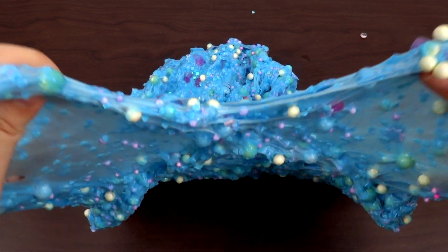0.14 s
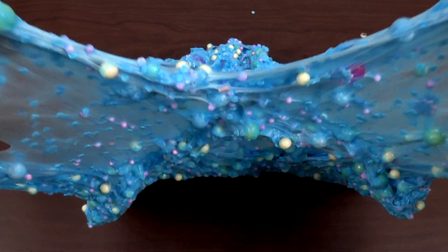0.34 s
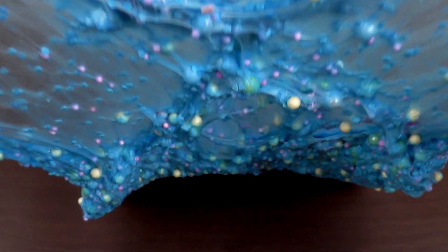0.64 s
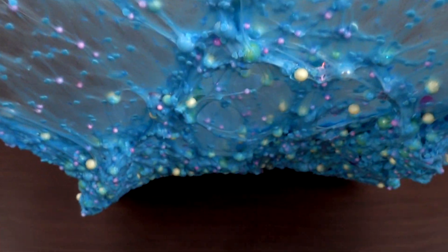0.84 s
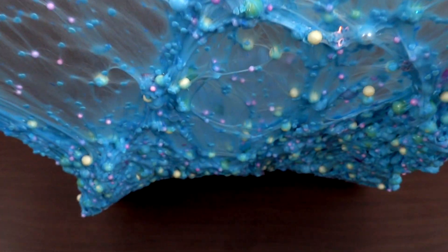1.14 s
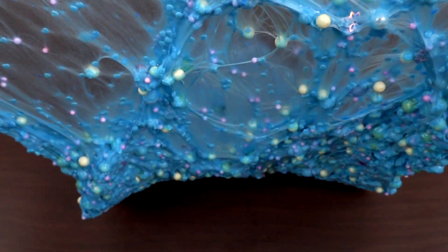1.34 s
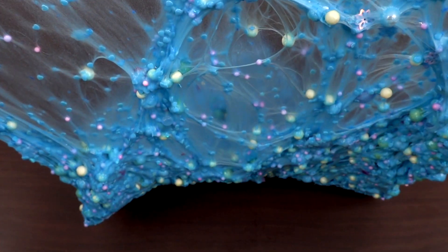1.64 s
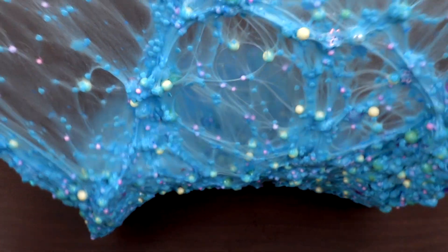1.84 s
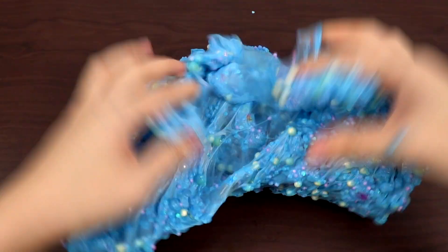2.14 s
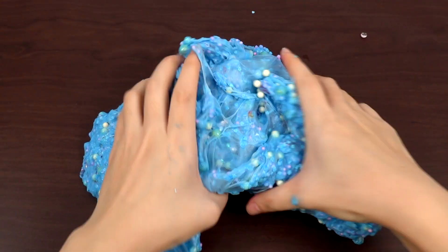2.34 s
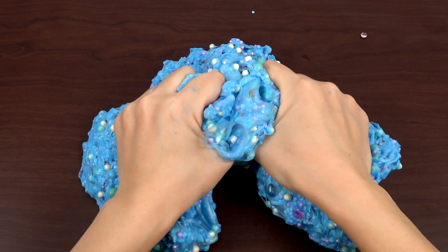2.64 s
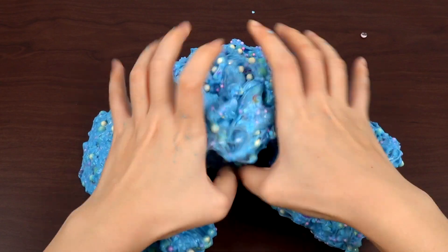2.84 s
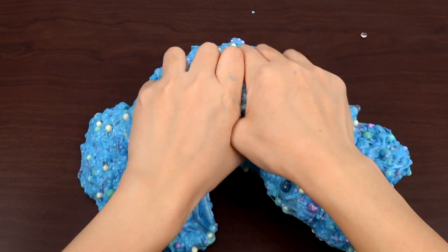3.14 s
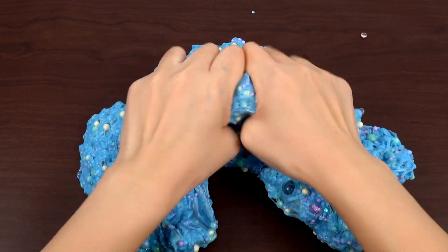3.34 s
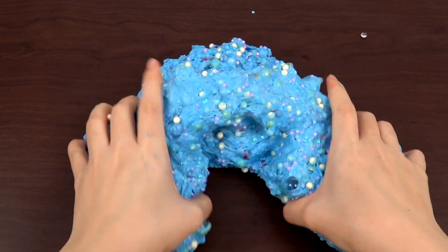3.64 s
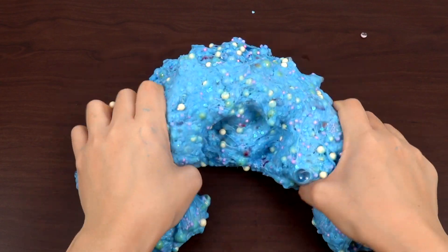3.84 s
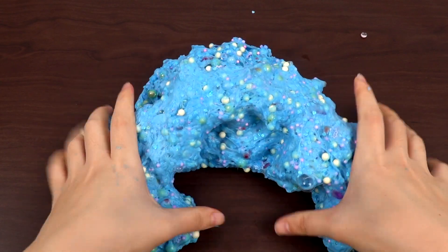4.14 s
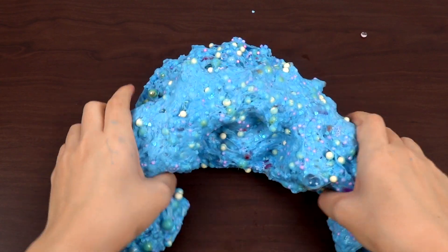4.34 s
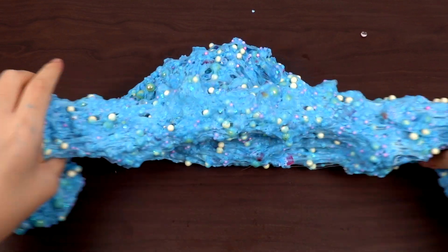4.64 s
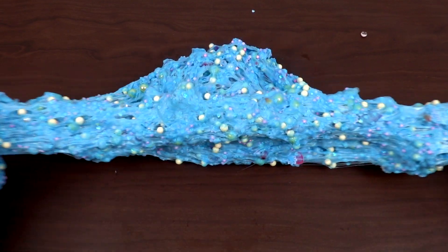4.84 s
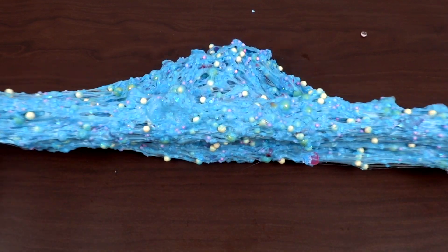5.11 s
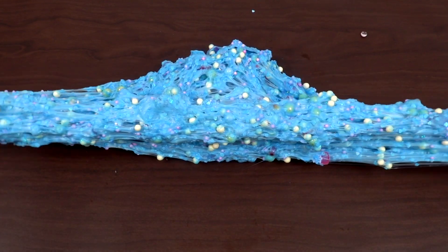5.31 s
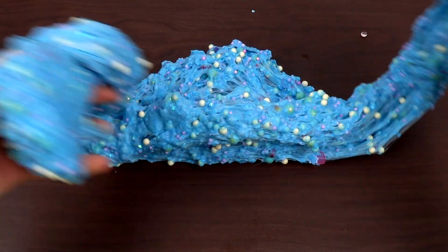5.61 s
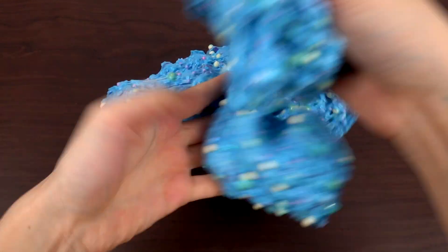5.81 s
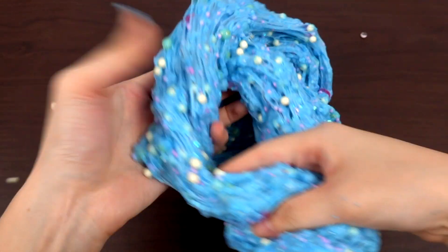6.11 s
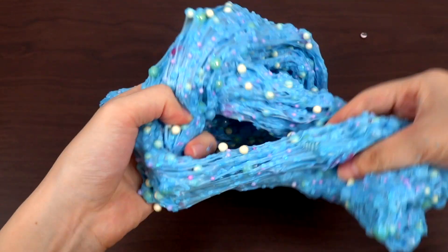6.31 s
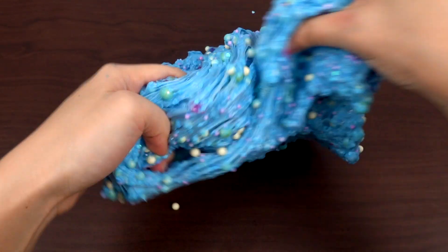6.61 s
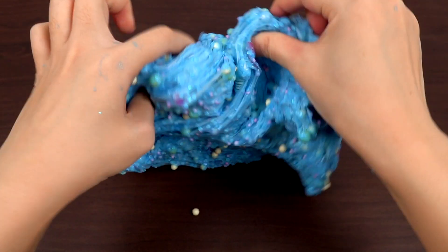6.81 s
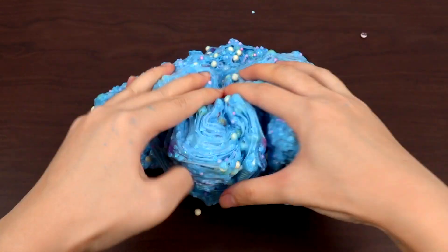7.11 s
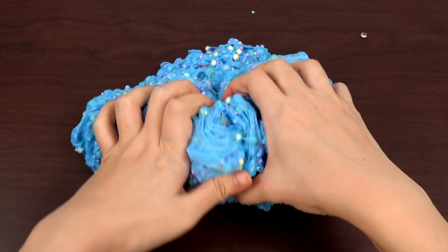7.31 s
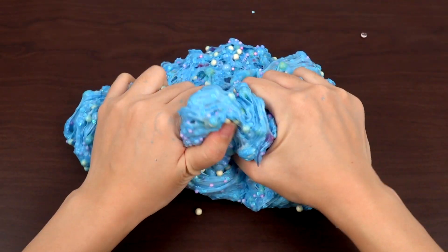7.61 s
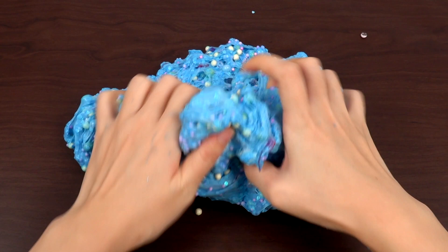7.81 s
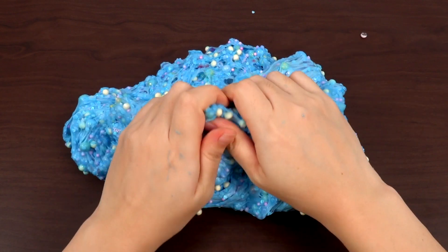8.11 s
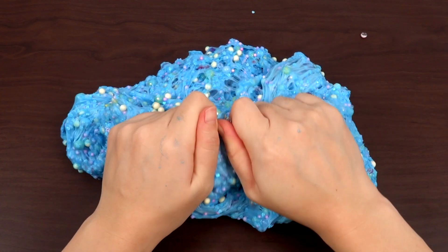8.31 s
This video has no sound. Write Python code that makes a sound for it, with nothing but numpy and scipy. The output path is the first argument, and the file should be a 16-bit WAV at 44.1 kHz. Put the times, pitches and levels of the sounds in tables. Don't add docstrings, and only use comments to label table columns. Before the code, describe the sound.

Crunchy foam-bead slime fizzes softly, then bursts into dense squelchy popping as hands squeeze, fold and squeeze it again in a quiet room.

```python
import sys
import numpy as np
from scipy import signal
from scipy.fft import rfft, irfft
from scipy.io import wavfile
from scipy.ndimage import uniform_filter1d

SR = 44100
rng = np.random.default_rng(int(sys.argv[2]) if len(sys.argv) > 2 else 0)


def wav_out(sig):
    wavfile.write(sys.argv[1], SR, np.round(np.clip(np.atleast_2d(sig).T, -1, 1) * 32767).astype(np.int16))


def voltage_ratio(level):
    return 10 ** (np.asarray(level, float) / 20)


N = 373086


def rms_one(x):
    return x / np.sqrt(np.mean(x ** 2) + 1e-20)


def at_hz(points, hz):
    table_hz, values = np.transpose(points)
    return np.interp(np.log(hz), np.log(table_hz), values)


def in_time(rows):
    start_s, *columns = np.transpose(rows)
    return [np.interp(np.arange(N) / SR, start_s, column) for column in columns]


def bandpass(x, order, low_hz, high_hz):
    return signal.sosfilt(signal.butter(order, [low_hz, high_hz], "band", fs=SR, output="sos"), x)


def drift(rate_hz):
    r = np.exp(-40 * np.pi * rate_hz / SR)
    noise = rng.standard_normal(N // 20 + 4002)
    slow = signal.lfilter([1], [1, -2 * r, r * r], noise)[4000:]
    return np.interp(np.arange(N) / 20, np.arange(len(slow)), rms_one(slow))


# start_s [s], peak_db [dB], pitch_hz [Hz], ring_cycles [cycles]
RINGING = [(0.0339, -21, 3260, 2.4), (.1912, -33.5, 2390, 2.8), (0.1986, -30.5, 2490, 2.8),
           (0.771, -32.5, 4840, 7), (2.4289, -3, 6300, 3), (2.6181, -3.5, 4050, 3.6),
           (2.6872, 1.5, 2670, 1.8), (2.7054, -10.5, 4740, 11), (3.026, -11.5, 4980, 15),
           (3.0344, -3, 2630, 3.9), (3.0851, -7, 1780, 3.7), (3.119, -10, 1750, 3.2),
           (3.1687, 0.5, 3300, 7.2), (3.2131, -19, 4690, 4.8), (3.2225, -10.5, 5000, 4.1),
           (3.2361, -4, 4040, 4.9), (3.2398, -18, 3360, 4.2), (3.323, -13, 2270, 3.1),
           (4.394, -17.5, 6500, 2.8), (4.5962, -15.5, 5450, 3.7), (4.8928, -9, 9300, 5.3),
           (4.8925, -5.5, 5120, 11), (4.9993, -21.5, 5700, 3.8), (5.4478, -30.5, 3600, 4),
           (5.6418, -29.5, 2720, 3.1), (6.675, -9.5, 3280, 4.9), (6.9275, -23.5, 2830, 5.2),
           (7.5928, 3.5, 9580, 9.5), (7.6636, -15, 5960, 4.1), (8.1447, -2.5, 4930, 4.6)]
# start_s [s], peak_db [dB], pitch_hz [Hz]
KNOCKS = [
    (2.6879, -16, 380),
    (2.6188, -11, 1350),
    (3.327, -28.5, 540),
    (4.066, -28.5, 1100),
    (3.9, -17, 645),
    (4.8938, -28, 940),
    (4.9337, -40, 770),
    (5.3072, -28, 1380),
    (5.94, -38, 920),
    (7.3, -22.5, 1360),
]
# start_s [s], peak_db [dB], pitch_hz [Hz]
SPLITTING = [(.0047, -31.5, 7000), (.405, -29.5, 2780), (1.345, -43, 7150), (1.727, -29.5, 4470),
             (2.2115, -25.5, 9500), (2.2541, -25.5, 4800), (2.4617, -12, 8850), (2.6456, -5.5, 5030),
             (2.7255, -10.5, 5250), (3.0191, -25, 2820), (3.0544, -15, 1740), (3.1149, -13.5, 1700),
             (3.1578, -11, 6150), (3.2078, -20, 9600), (3.271, -13.5, 2650), (3.5996, -25.5, 3000),
             (3.6674, -17.5, 7350), (3.7143, -14.5, 1260), (3.8769, -21, 4550), (3.9115, -16.5, 4840),
             (3.9462, -28, 3870), (4.3521, -20.5, 2460), (4.5238, -24.5, 2750), (4.6903, -18.5, 4330),
             (4.7583, -22, 3100), (4.9345, -22.5, 7860), (5.2337, -42, 4690), (5.2641, -24.5, 2600),
             (5.2749, -28, 4950), (5.3072, -21.5, 4280),
             (5.7086, -36.5, 2900), (5.9083, -29, 6140), (6.0001, -34, 3150), (6.1708, -28, 2020),
           (6.2317, -20.5, 4430), (6.3774, -25.5, 2570), (6.419, -31.5, 10330), (6.55, -43, 5030),
           (6.647, -21, 6860), (6.747, -16.5, 4940), (6.97, -18, 10000), (7.092, -21, 4240),
           (7.1609, -21, 5040), (7.1833, -21, 2180), (7.2235, -17, 4120), (7.3209, -20, 5330),
           (7.3649, -18, 4900), (7.4262, -18.5, 3230), (7.5374, -24.5, 5680), (7.6004, -9, 5900),
           (7.6798, -8, 11100), (7.727, -30, 5510), (7.7594, -33, 5360), (7.806, -27, 3570),
           (8.1327, -18, 4160), (8.161, -8.5, 4470), (8.3608, -16.5, 3450), (8.3784, -14.5, 5160),
           (8.4036, -15.5, 6540), (8.4429, -16, 3750),
             (.108, -40, 2020), (1.831, -37, 3540), (2.566, -25, 8900), (2.5952, -34, 9500),
              (2.652, -14, 5130), (3.4204, -21, 2760), (3.7453, -14.5, 2400), (3.86, -22, 5330),
              (6.6806, -17.5, 3140), (7.623, -9.5, 12300), (8.0295, -30, 2900), (8.1076, -42, 5100),
              (4.8814, -25, 9000), (8.1447, -11.5, 9500), (3.1696, -9.5, 9600), (0.214, -35.5, 6000),
              (.522, -42, 7000), (.698, -42, 7000), (.7458, -38, 5000), (0.817, -42, 5000),
              (1.038, -41.5, 9470), (1.152, -47, 9500), (1.892, -39, 5000), (7.302, -27.5, 1800),
              (7.524, -25, 3000)]
# start_s [s], peak_db [dB], pitch_hz [Hz]
TEARING = [(.4535, -34.5, 9100), (.8736, -32.5, 5400), (1.0483, -33, 2730), (1.4874, -43, 3100),
           (3.3281, -5, 9400), (3.3526, -20, 9800), (4.222, -27, 9560), (4.6248, -41, 6500),
           (4.8165, -26, 9100), (5.4305, -25.5, 6980), (6.8553, -30.5, 10100), (7.4891, -23, 9900),
           (1.9842, -21, 9000), (4.897, -20.5, 5150), (5.8184, -27.5, 11700), (6.0746, -23, 8600),
           (6.2677, -17.5, 5240), (7.0144, -12.5, 10000), (7.0311, -47, 9350), (7.3315, -19.5, 8700),
           (7.4611, -15, 3380), (8.2365, -27.5, 9140), (8.421, -17, 5210)]


def pops():
    clean_db, soft_db, split_db, tear_db = -22, -40, -8.5, 0.5
    spread_db, lag_s, crack_t60_s = 1.5, .000024, .0018
    length = 600
    rows = [(*row, clean_db) for row in RINGING]
    rows += [(*row, 2.73, soft_db) for row in KNOCKS]
    for table, crack_db in [(SPLITTING, split_db), (TEARING, tear_db)]:
        for start_s, peak_db, pitch_hz in table:
            ring_cycles = 3.77 * (pitch_hz / 4000) ** 0.45
            rows.append((start_s, peak_db, pitch_hz, ring_cycles, crack_db))
    out, t = np.zeros((2, N + 610)), np.arange(length) / SR
    noise = rng.standard_normal((len(rows), length))
    places = noise[:, -1]
    cracks = bandpass(noise, 2, 1000, 10500) * voltage_ratio(-60 * t / crack_t60_s)
    for (start_s, peak_db, pitch_hz, cycles, crack_db), place, crack in zip(rows, places, cracks):
        swell = 1 - np.exp(-t * pitch_hz * 0.71)
        decay = voltage_ratio(-60 * t * pitch_hz / (1.1 * np.clip(cycles, 1, 14)))
        cavity = np.sin(2 * np.pi * pitch_hz * t) * decay * swell
        burst = cavity / np.sqrt(np.sum(cavity ** 2))
        burst = burst + voltage_ratio(crack_db + 2.5) * crack / np.sqrt(np.sum(crack ** 2))
        burst *= -voltage_ratio(peak_db) / np.max(np.abs(burst))
        i = int(start_s * SR) - 2
        late = round(place * lag_s * SR)
        out[0, i:i + length] += burst * voltage_ratio(spread_db * place / 2)
        out[1, i + late:i + late + length] += burst * voltage_ratio(-spread_db * place / 2)
    return out[:, :N]


def spray(bursts):
    level_db, t60_s = -11.5, 0.081
    t = np.arange(int(.12 * SR)) / SR
    droplet_db = 9.0 * rng.standard_normal(len(t)) - 60 * t / t60_s
    trail = rng.standard_normal(len(t)) * voltage_ratio(droplet_db) * (t > .002)
    trail = signal.lfilter([1], [1, -.5], trail)
    trail /= np.sqrt(np.sum(trail ** 2))
    return voltage_ratio(level_db) * signal.oaconvolve(bursts, trail[None], axes=1)[:, :N]


# [dB, deeper and duller]
STROKES = [(0, 0.11, -68, -3, -10.5), (1.92, 0.087, -65.5, 12, -3.5), (2.01, 0.068, -53.5, -10.5, -16),
           (2.15, .32, -54.5, -0.5, 1.5), (2.54, 0.14, -48.5, 12, 2), (2.8, 0.075, -46.5, 2, 2.5),
           (3.01, 0.15, -49.5, 0, 1), (3.2, 0.14, -56, 6.5, -3), (3.41, 0.08, -51, 3, 2.5),
           (3.65, 0.3, -50.5, 5.5, 1), (4.05, .15, -50, -2.5, 2.5), (4.22, 0.35, -56, 7, 1.5),
           (4.63, 0.32, -52, -3.5, 0.5), (5.0, 0.465, -62.5, 2, -2.5), (5.5, 0.21, -70, -2, -4),
           (5.75, 0.23, -63.5, 6.5, -4.5), (6.06, 0.16, -56, -3.5, -4.5), (6.25, 0.33, -60, 3.5, -1.5),
           (6.67, 0.52, -53, -4, -1.5), (7.09, 0.33, -53, 0.5, 0.5), (7.44, 0.26, -47.5, -9, 1.5),
           (7.81, 0.076, -54, 12.5, 3), (8.04, 0.15, -60.5, 9, -2.5), (8.22, 0.22, -57.5, 9.5, 3)]


def effort():
    rise_db_per_s, fall_db_per_s = 347, 333
    t, layers = np.arange(N) / SR, np.zeros((3, N))
    resting = (0, N / SR, -76, 0.0092, 0)
    for start_s, length_s, effort_db, change_db, wet_db in [resting] + list(STROKES):
        level_db = effort_db + change_db * np.clip((t - start_s) / length_s, 0, 1)
        level_db -= rise_db_per_s * np.maximum(start_s - t, 0)
        level_db -= fall_db_per_s * np.maximum(t - start_s - length_s, 0)
        squelch_db, fine_db = -5 + 2.64 * wet_db, 3.0 - 0.5 * wet_db
        shift_db = np.array([[squelch_db], [0], [fine_db]])
        layers += voltage_ratio(2 * level_db) * voltage_ratio(2 * shift_db)
    return uniform_filter1d(10 * np.log10(layers), size=900)


def ring(clicks, hz, cycles):
    r, w = voltage_ratio(-60 * hz / (cycles * SR)), 2 * np.pi * hz / SR
    section = [1, 0, -1, 1, -2 * r * np.cos(w), r * r]
    return signal.sosfilt([section, section], clicks + 1e-18)


# pitch_hz [Hz], level_db [dB per Hz]
CRACKLE = [(220, -4), (600, 1), (1400, 1), (2700, 2), (5000, 3.5), (7500, -3.5), (10000, -4),
           (14000, -13.5)]


def crackle(squelch_db, coarse_db, fine_db):
    size_db, clump_db, cycles, lag_s = 3.5, 6.0, 3.21, .000025
    per_s = np.clip(8000 * voltage_ratio(.5 * (fine_db + 50)), 400, 22000)
    toss, size = rng.random(N), rng.exponential(1, N)
    sizes = voltage_ratio(size_db * np.minimum(size, 5)) * rng.choice([-1, 1], N) / np.sqrt(per_s / SR)
    fizz = sizes * (toss < per_s * voltage_ratio(clump_db * drift(30)) / SR)
    snap_now = 1 - toss < (30 + per_s / 14) / SR
    snaps = sizes * voltage_ratio(10 + 1.0 * np.minimum(size, 3)) * snap_now
    cavity = rng.integers(0, 20, N)
    place = rng.standard_normal(N)
    late = np.arange(N) + np.round(place * lag_s * SR).astype(int)
    late = np.clip(late, 0, N - 1)
    out = np.zeros((2, N))
    for k, hz in enumerate(np.geomspace(200, 14500, 20)):
        fine = np.clip(np.log(hz / 1500) / np.log(4), 0, 1)
        big = np.clip(np.log(1000 / hz) / np.log(3), 0, 1)
        effort_db = coarse_db + fine * (fine_db - 6 - coarse_db) + big * (squelch_db + 3.5 - coarse_db)
        level = voltage_ratio(effort_db + at_hz(CRACKLE, hz) + 2.0 * drift(4.6))
        shaken = (-1) ** k * snaps * np.exp(-((cavity - k) / 3.42) ** 2)
        clicks = level * (fizz * (cavity == k) + shaken)
        left = clicks * voltage_ratio(3.1 * place)
        right = np.bincount(late, clicks * voltage_ratio(-1.5 * place), N)
        one_click = np.sqrt(np.sum(ring(np.eye(1, 2000)[0], hz, cycles) ** 2))
        out += ring(np.array([left, right]), hz, cycles) * np.sqrt(hz / 1000) / one_click
    return voltage_ratio(-4) * out


# start_s [s], push_db [dB], push_decay_s [s], wobble_hz [Hz],
# wobble_db [dB], wobble_t60_s [s]
PUFF = (2.5176, 3, .007, 31, -16, .6)


def puff():
    start_s, push_db, push_decay_s, wobble_hz, wobble_db, wobble_t60_s = PUFF
    t = np.maximum(np.arange(N) / SR - start_s, 0)
    wobble = -voltage_ratio(wobble_db - 60 * t / wobble_t60_s) * np.cos(2 * np.pi * wobble_hz * t)
    sway = voltage_ratio(-18) * np.sin(np.pi * np.minimum(t / .15, 1))
    push = -voltage_ratio(push_db) * np.exp(-(t / push_decay_s) ** 1.5) * np.minimum(t / .0001, 1)
    rebound = voltage_ratio(-10) * np.exp(-((t - .017) / .008) ** 2) * (t > 0)
    left = push + rebound + (wobble + sway) * np.minimum(t / .012, 1)
    right_sway = voltage_ratio(-16) * np.sin(2 * np.pi * 4.4 * t) * np.exp(-t / .2)
    right = right_sway + .3 * wobble * np.minimum(t / .03, 1)
    return np.array([left, right])


# pitch_hz [Hz], t60_s [s]
ROOM_T60 = [(300, 0.12), (1500, 0.13), (5000, 0.21), (14000, 0.24)]


def room(x):
    level_db, gap_s, alike = -13.5, .004, .75
    t, answer = np.arange(int(.4 * SR)) / SR, 0
    edges_hz = 300 * 2 ** np.arange(0, 6, .7)
    mid, side = rng.standard_normal((2, len(t)))
    white = np.sqrt(1 + alike) * mid + np.sqrt(1 - alike) * side * [[1], [-1]]
    for low_hz, high_hz in zip(edges_hz, edges_hz[1:]):
        t60_s = at_hz(ROOM_T60, np.sqrt(low_hz * high_hz))
        answer = answer + bandpass(white, 2, low_hz, high_hz) * voltage_ratio(-60 * t / t60_s)
    answer *= np.clip((t - gap_s) / .002, 0, 1)
    answer *= 1 + 1.1 * (t < .022)
    answer /= np.sqrt(np.sum(answer ** 2) / 2)
    return voltage_ratio(level_db) * signal.oaconvolve(x.mean(axis=0)[None], answer, axes=1)[:, :N]


# start_s [s], level_db [dB]
AIR = [(0.0, -51), (1.38, -46), (1.447, -36.5), (1.52, -42.5), (1.93, -50.5), (2.125, -34.5), (2.6, -31.5),
       (3.39, -41.5), (3.7, -36.5), (4.0, -41), (4.23, -32), (4.55, -45.5), (5.66, -52), (6.04, -40),
       (6.435, -46), (7.75, -43), (7.96, -33.5), (8.456, -45.5)]


def air():
    air_db, = in_time(AIR)
    white = rng.standard_normal((2, 3, N + SR))
    lumps = bandpass(white[0], 3, 12, 48)[:, SR:]
    rough = bandpass(white[1], 1, 55, 170)[:, SR:]
    rough = signal.lfilter([.04], [1, -.96], rough)
    rough_db = -17.0 + 0.2 * (air_db + 49) + 1.5 * drift(9.2)
    gusts = rms_one(lumps) + voltage_ratio(rough_db) * rms_one(rough)
    pair = (gusts[:2] + gusts[2]) / np.sqrt(2)
    return voltage_ratio(air_db - 6 + 3.1 * drift(2.8)) * pair * voltage_ratio([[1.5], [0]])


# pitch_hz [Hz], level_db [dB per Hz]
HUSH = [(100, -3), (200, -8), (400, -14), (900, -18.5), (2000, -24), (6000, -28), (10000, -31),
        (16000, -32.5)]


def hush():
    hz = np.maximum(np.fft.rfftfreq(N, 1 / SR), 1)
    shape = voltage_ratio(at_hz(HUSH, hz)) * np.minimum(hz / 90, 1) ** 2
    noise = irfft(rfft(rng.standard_normal((2, N))) * shape, N)
    return voltage_ratio(-62) * rms_one(noise)


def scene():
    bursts = pops()
    slime = bursts + crackle(*effort())
    return slime + spray(bursts) + puff() + room(slime) + air() + hush()


def band_limit(x):
    return signal.sosfilt(signal.butter(12, 16270, fs=SR, output="sos"), x)


# pitch_hz [Hz], width_hz [Hz], level_db [dB]
CAPSULE = [(7630, 2270, -3), (9500, 5300, 5)]


def record(dry):
    for pitch_hz, width_hz, level_db in CAPSULE:
        b, a = signal.iirpeak(pitch_hz, pitch_hz / width_hz, fs=SR)
        dry = dry + (voltage_ratio(level_db) - 1) * signal.lfilter(b, a, dry)
    coupled = signal.sosfilt(signal.butter(1, 3, "high", fs=SR, output="sos"), dry)
    clipped = np.clip(coupled, -1, 1)
    mix = signal.sosfilt(signal.cheby2(12, 55, 16200, fs=SR, output="sos"), clipped)
    return band_limit(np.clip(mix, -1, 1))


dry = scene()
out = record(dry)
wav_out(out)
```